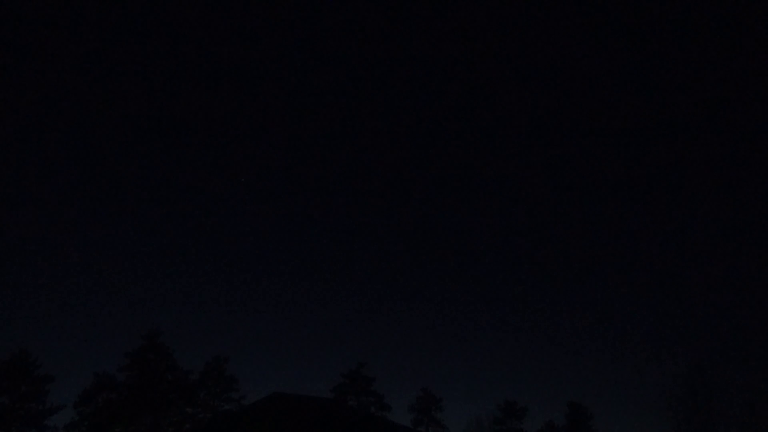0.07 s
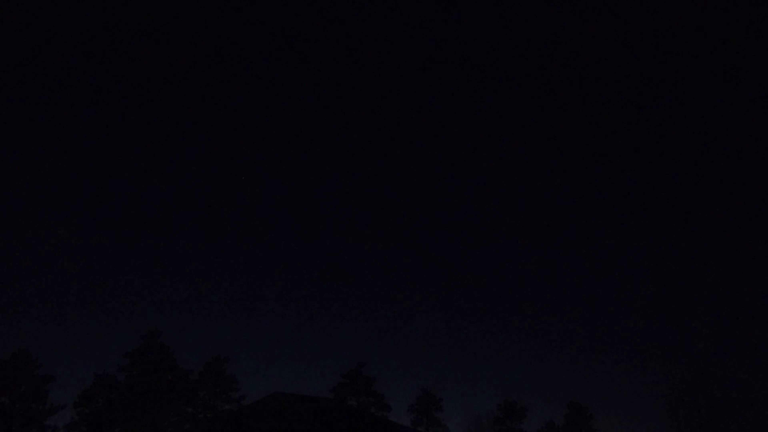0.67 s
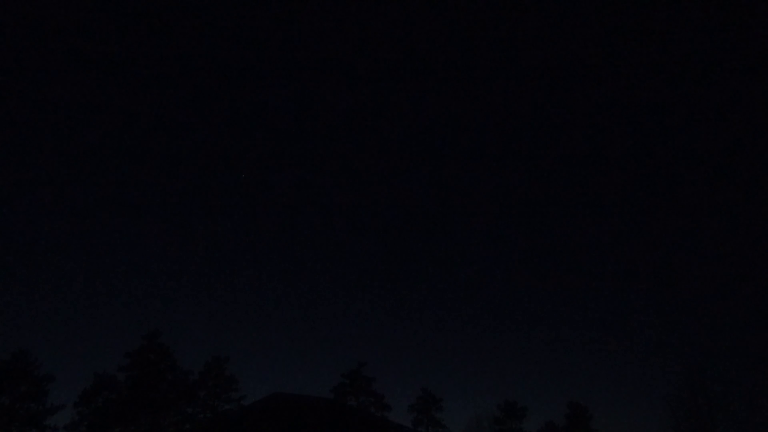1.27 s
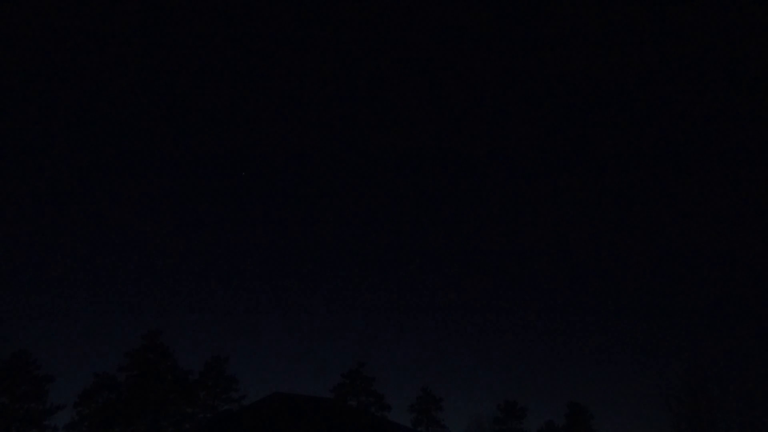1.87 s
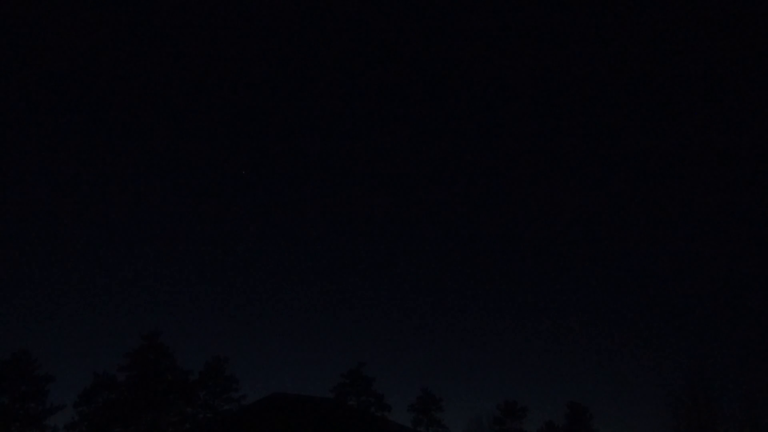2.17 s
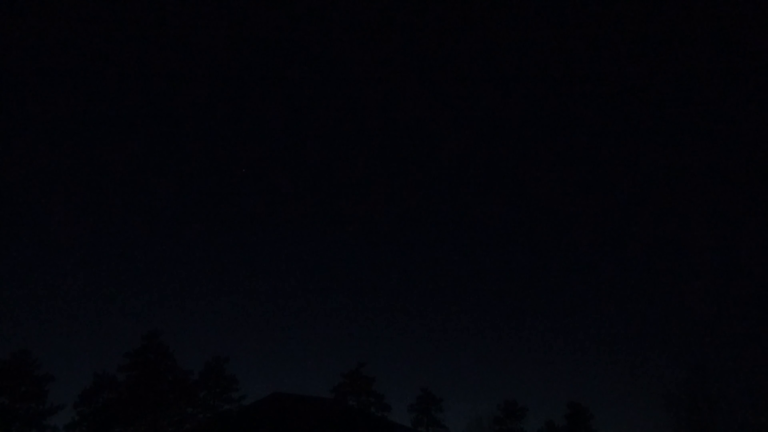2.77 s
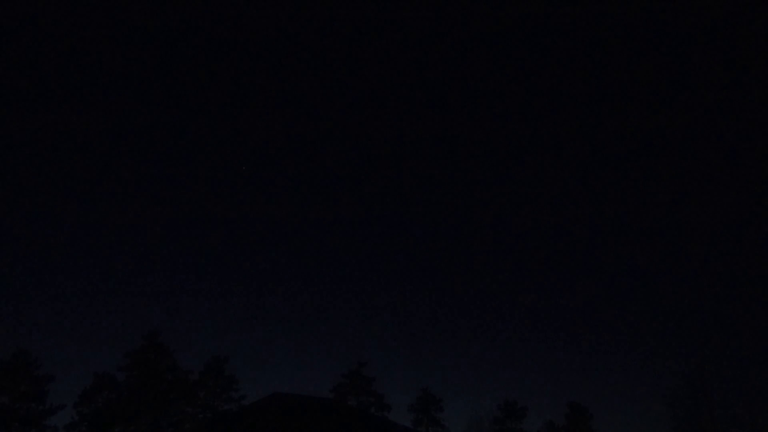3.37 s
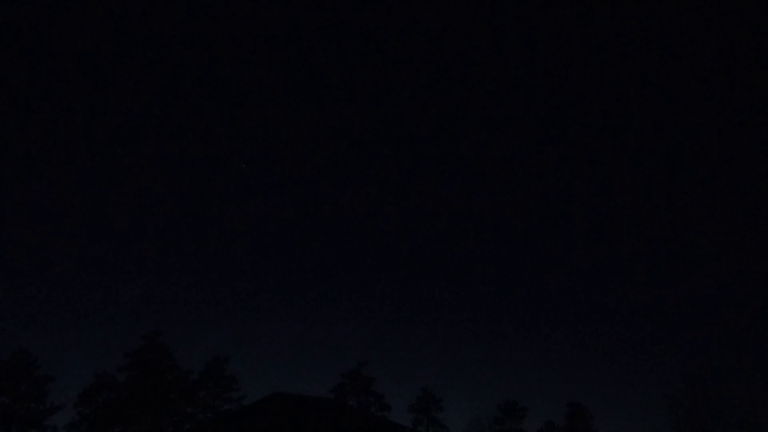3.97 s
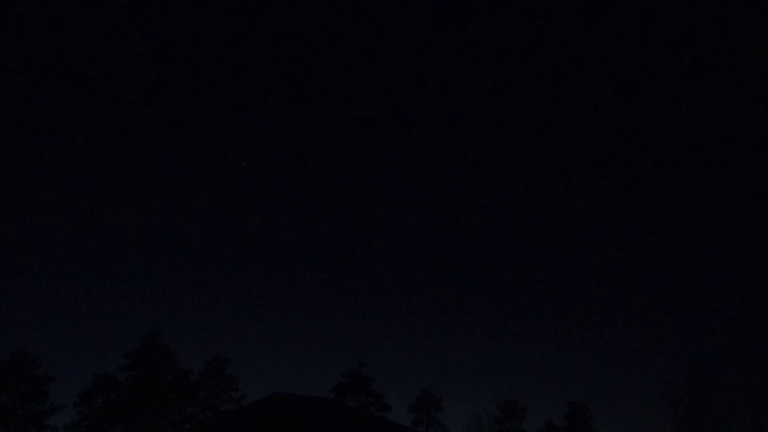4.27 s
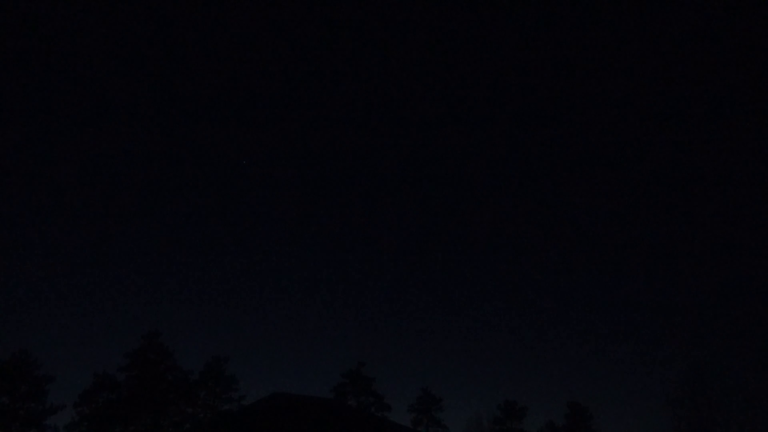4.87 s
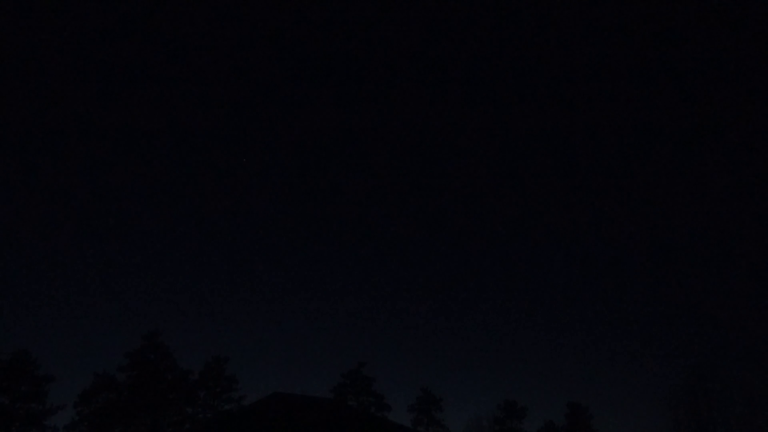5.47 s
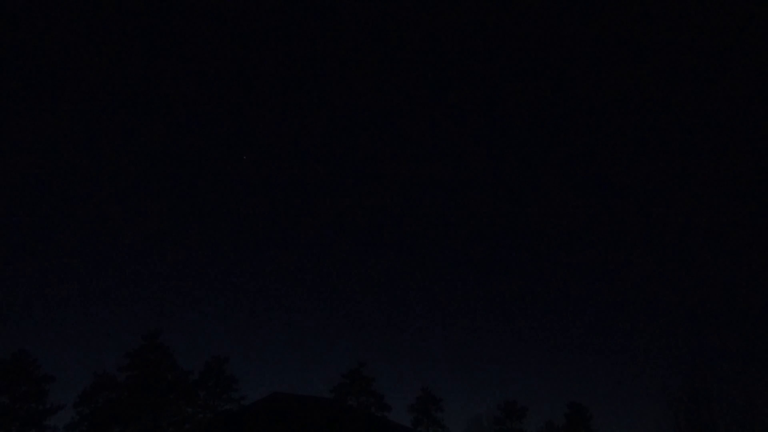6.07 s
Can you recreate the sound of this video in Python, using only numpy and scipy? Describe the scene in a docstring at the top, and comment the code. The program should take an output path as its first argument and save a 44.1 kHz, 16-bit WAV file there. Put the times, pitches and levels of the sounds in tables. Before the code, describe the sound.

A steady night chorus of frogs whistles, ticks and chuckles, with a few short croaks and light hiss underneath.

```python
"""A pond at night, a little to the right, over a low rumble, a far chorus and a camera's hum and hiss.
From the start three kinds of frogs call at once: peepers whistle short rising notes, small frogs tick
like pebbles as the larynx rings the vocal sac, larger ones chuckle in pulses through throat and chest.
Three croaks come in the first two seconds, a faint dry snap stands out at 4.6 s, and two more croaks
follow. The calling runs on to the end, with the trees giving peeps and ticks a thin tail."""
import sys
import numpy as np
from scipy import signal
from scipy.fft import rfft, irfft, next_fast_len
from scipy.io import wavfile
from scipy.ndimage import map_coordinates

SR = 44100
rng = np.random.default_rng(int(sys.argv[2]) if len(sys.argv) > 2 else 0)


def output_pcm(signal):
    """Save a mono or channel-first signal as 16-bit PCM at the path in sys.argv[1].

    Samples are clipped to [-1, 1] before scaling.
    """
    pcm = np.clip(np.atleast_2d(signal).T, -1, 1) * 32767
    wavfile.write(sys.argv[1], SR, np.round(pcm).astype(np.int16))


N = 273861

# Tone curves of the noise beds; SIDE is what differs between the ears: (frequency [Hz], relative level [dB])
RUMBLE_EQ = [(20, -17), (75, 2), (140, -4.5), (210, -10), (400, -20.5), (900, -56)]
RUMBLE_SIDE_EQ = [(20, -24), (75, -3), (140, -2), (210, -3), (400, -13), (900, -62)]
HISS_EQ = [(100, 5), (2500, 13), (7000, 3), (15500, -3)]
HISS_SIDE_EQ = [(100, 3), (2500, 11), (7000, 6.5), (10000, 4), (15500, -20)]
FAR_CHUCKLE_EQ = [(380, -16), (520, -6), (850, -6), (1250, -9), (1900, -3), (2500, -19.5), (3200, -32)]
# Dry snaps close by: (time [s], level before filtering [dB])
DRY_SNAPS = [(.31, -38), (2.773, -41), (4.631, -31)]
# The larger frogs: (throat resonance [Hz], rms level [dB], cluck times [s])
CLUCKING_FROGS = [(1660, -48.5, [1.026, 1.21, 1.275, 1.565, 1.759, 4.415, 4.9, 5.733, 5.796]),
                  (1830, -48.5, [.423, .742, .803, 2.157, 3.225, 3.4, 3.743, 4.118, 4.555]),
                  (2130, -48, [.111, .355, 1.823, 2.893, 3.505, 4.187, 6.089])]
# Their drawn-out croaks: (time [s], length [s], rms level [dB])
LONG_CROAKS = [(0.546, 0.13, -48.5), (1.098, 0.16, -50), (1.695, 0.11, -51), (4.998, 0.14, -50),
               (5.861, 0.042, -48.5)]
# Near ticking frogs: (sac pitch [Hz], bouts), each bout (start [s], end [s], ticks [count], level [dB])
TICKING_FROGS = [(3590, [(.14, .49, 5, -31), (.705, 1.085, 5, -27.5), (1.207, 1.458, 3, -28.5),
                 (1.498, 1.78, 4, -31.5), (2.075, 2.356, 4, -30.3), (2.466, 2.659, 3, -28),
                 (2.796, 2.897, 2, -32), (3.449, 3.535, 2, -35), (3.744, 3.906, 3, -29.5),
                 (4.13, 4.393, 4, -30.5), (4.262, 4.34, 2, -29), (4.491, 4.735, 3, -29),
                 (4.843, 5.3, 6, -30), (5.163, 5.478, 4, -29.5), (5.58, 5.67, 2, -30.5),
                 (5.997, 6.17, 3, -29)]), (3860, [(.031, .312, 4, -36), (.917, 1.094, 3, -34),
                 (1.458, 1.546, 2, -34), (3.808, 4.102, 4, -33), (5.086, 5.285, 3, -41)]),
                 (4020, [(.433, .865, 6, -34.5), (1.905, 2.375, 6, -34.5), (2.965, 3.039, 2, -34),
                 (3.114, 3.469, 5, -33), (5.67, 6.099, 6, -32.5)])]
# Near peepers, each repeating its own note: (start pitch [Hz], end pitch [Hz], length [s],
# rms level [dB], crest [share of the note], left minus right [dB], call times [s])
PEEPING_FROGS = [(2883, 3226, .13, -37.5, 0.54, -5, [.008, 1.204, 1.528, 2.54, 2.738, 4.027, 4.411, 5.407]),
                 (2667, 2882, .112, -40.5, 0.11, -5, [.047, 1.153, 2.725, 4.383, 5.674]),
                 (2722, 3014, .118, -40.5, 0.2, -6.3, [.67, .888, 2.286, 2.519, 4.301, 5.175, 5.378]),
                 (2693, 3080, .195, -43.5, .55, -4.6, [.938, 1.63, 3.01, 3.205, 4.786]),
                 (2850, 3200, .132, -42.9, 0.38, -4.5, [.376, 1.623, 2.98, 4.219, 4.613, 4.968, 5.609]),
                 (2945, 3270, .135, -46.5, 0.34, -5, [.155, 0.451, .87, 1.35, 1.92, 2.235, 2.49, 2.835, 2.92, 3.245, 4.18, 4.5, 5.035]),
                 (2744, 3060, .15, -48.5, 0.48, -3, [.24, 0.551, 1.871, 2.455])]

TICK_RISE_S = .002  # time for the vocal sac to ring up


def amp(db):
    return 10 ** (np.asarray(db) / 20)


def unit_rms(x):
    return x / np.sqrt(np.mean(x ** 2) + 1e-20)


def filtered(x, response):
    """Shape x with a gain given as a function of frequency."""
    size = next_fast_len(x.shape[-1] + SR // 10)
    return irfft(rfft(x, size) * response(np.fft.rfftfreq(size, 1 / SR)), size)[..., :x.shape[-1]]


def noise(eq):
    """A noise bed of rms 1, coloured by a tone curve."""
    hz, db = np.transpose(eq)
    response = lambda f: amp(np.interp(np.log(f + 1), np.log(hz), db))
    return unit_rms(filtered(rng.standard_normal(N), response))


def resonance(f, hz, width_hz):
    return 1j * f * width_hz / (hz * hz - f * f + 1j * f * width_hz)


def wobble(n, rate_hz):
    """A smooth random modulator, n samples long."""
    knots = rng.standard_normal(int(n * rate_hz / SR) + 4)
    return map_coordinates(knots, [np.arange(n) * rate_hz / SR])


def panned(x, left_db):
    """Pan x so that left minus right is left_db; the two average to x."""
    gains = amp([[left_db / 2], [-left_db / 2]])
    return x * gains / gains.mean()


def add(track, time, x):
    """Mix x into the track at a time in seconds."""
    start = int(time * SR)
    lo, hi = max(start, 0), min(start + x.shape[-1], N)
    if hi > lo:
        track[..., lo:hi] += x[..., lo - start:hi - start]


def background(rumble_db=-56, hum_hz=173.2, hum_db=-65, hiss_db=-62, chuckle_db=-67):
    """Distant rumble, hum and microphone hiss near the centre; the farthest chuckling spreads wide."""
    side = np.array([[1], [-1]])
    rumble = amp(rumble_db) * (noise(RUMBLE_EQ) + amp(-18.5) * side * noise(RUMBLE_SIDE_EQ))
    hum_gain = amp(hum_db + wobble(N, 1.86))
    hum_phase = 2 * np.pi * np.cumsum(hum_hz + wobble(N, 1.996)) / SR
    hum = hum_gain * unit_rms(np.sin(hum_phase))
    hiss = amp(hiss_db) * (noise(HISS_EQ) + amp(-8) * side * noise(HISS_SIDE_EQ))
    return rumble + hum + hiss + amp(chuckle_db) * side * noise(FAR_CHUCKLE_EQ)


def tree_echoes(x, wet_db=-15, rt60_s=.55):
    """The trees round the pond scatter a thin tail back."""
    t = np.arange(SR // 2) / SR
    tail = rng.standard_normal(len(t)) * amp(-60 * t / rt60_s)
    return amp(wet_db) * signal.fftconvolve(x, tail[None] / np.linalg.norm(tail), axes=1)[:, :N]


def snaps(fade_s=.022):
    """Short bright cracks with the top end softened."""
    out = np.zeros(N)
    t = np.arange(SR // 20) / SR
    for time, db in DRY_SNAPS:
        add(out, time, amp(db - 60 * t / fade_s) * rng.standard_normal(len(t)))
    return filtered(out, lambda f: resonance(f, hz=5500, width_hz=1400) / np.hypot(1, f / 12000))


def cluck(length, throat_hz, pulse_hz=400, chest_hz=820, chest_db=-6.5, rasp=.094):
    """A rough burst of pulses with a fast attack, through the throat and chest resonances."""
    n = int((length + .011) * SR)
    cycles = np.cumsum(pulse_hz * np.exp(.13 * wobble(n, 300))) / SR
    pulses = np.diff(np.floor(cycles), prepend=0) + rasp * rng.standard_normal(n)
    envelope = np.sin(np.pi * (np.arange(n) / n) ** .46)
    body = lambda f: resonance(f, throat_hz, 300) - amp(chest_db) * resonance(f, chest_hz, 320)
    band = lambda f: 1 / np.hypot(1, (f / 2400) ** 10) / np.hypot(1, (660 / (f + 1)) ** 10)
    return unit_rms(filtered(pulses * envelope, lambda f: body(f) * band(f)))


def chucklers(far_db=-56, bed_db=-54.5, left_db=-3, cluck_s=.022, vary_hz=50, far_count=40):
    """The larger frogs: near clucks and croaks, scattered farther ones, and a wash of the farthest."""
    out = amp(bed_db + wobble(N, 18)) * noise(FAR_CHUCKLE_EQ)
    for throat_hz, db, times in CLUCKING_FROGS:
        for time in times:
            add(out, time - .002, amp(db) * cluck(cluck_s, throat_hz + vary_hz * rng.normal()))
    for time, length, db in LONG_CROAKS:
        add(out, time, amp(db) * cluck(length, throat_hz=1875))
    for when, pitch in rng.random((far_count, 2)):
        add(out, when * N / SR, amp(far_db) * cluck(cluck_s, throat_hz=1700 + 300 * pitch))
    return panned(out, left_db)


def tick(sac_hz, sag_hz=50, snap_db=-24, snap_decay_s=.004, snap_band_hz=(4700, 5850)):
    """A snap of the larynx rings the vocal sac for a few milliseconds while its pitch sags."""
    t = np.arange(SR // 70) / SR
    age = t / TICK_RISE_S  # the ring peaks at age 1
    hz = sac_hz + sag_hz * (np.exp(1 - age) - 1)
    phase = 2 * np.pi * (np.cumsum(hz) / SR + rng.random())
    ring = (age * np.exp(1 - age)) ** 2 * np.sin(phase)
    burst = rng.standard_normal(len(t)) * np.exp(-t / snap_decay_s)
    snap = signal.lfilter(*signal.butter(3, snap_band_hz, "band", fs=SR), burst)
    return ring + amp(snap_db) * snap / np.abs(snap).max()


def tick_chorus(nearest_db=-33, depth_db=16, centre_hz=3585, spread_hz=450, left_db=-4.5, count=20):
    """Many small frogs, ever farther away, each ticking at its own nearly even pace."""
    out = np.zeros((2, N))
    for frog in range(count):
        ticks_per_s = 11.2 * np.exp(rng.normal() / 10)
        beats = np.cumsum(1 + rng.standard_normal(160) / 20)
        times = beats / ticks_per_s - 1 - rng.random()  # already under way at the start
        db = nearest_db - depth_db * np.sqrt(frog / count)
        for time, (accent, pitch, pan) in zip(times, rng.standard_normal((len(times), 3))):
            if 0 < time < N / SR:
                hz = centre_hz + spread_hz * np.tanh(pitch / 2)
                add(out, time, panned(amp(db + 2 * np.tanh(accent)) * tick(hz), left_db + pan))
    return out


def tickers(left_db=-5, vary_hz=50, slowing=.06, swell_db=1.5, trail_db=-10, trail_s=.0063, drop_hz=100):
    """Near frogs tick in bouts that slow and swell; a weaker, lower pulse trails each tick."""
    out = np.zeros((2, N))
    for sac_hz, bouts in TICKING_FROGS:
        for start, end, ticks, bout_db in bouts:
            for progress in np.linspace(0, 1, round(ticks)):
                pitch, gap, accent, pan = rng.standard_normal(4)
                time = start + (end - start) * (progress - slowing * progress * (1 - progress))
                db = bout_db + swell_db * (progress - .5)
                hz = sac_hz + vary_hz * pitch
                add(out, time - TICK_RISE_S, panned(amp(db) * tick(hz), left_db + pan))
                trail = amp(db + trail_db + accent) * tick(hz - drop_hz)
                add(out, time + trail_s * np.exp(gap / 2), panned(trail, left_db + pan))
    return out


def peep(length, start_hz, end_hz, crest=.23, bend=.363, flutter_db=.53, overtone_db=-34):
    """A nearly pure whistle whose rise flattens out; the vocal sac leaks a faint overtone a fifth up."""
    t = np.arange(int(length * SR)) / SR
    progress = t / length
    glide = progress + bend * progress * (1 - progress)
    hz = start_hz + (end_hz - start_hz) * glide + 8 * wobble(len(t), 138)
    phase = 2 * np.pi * (np.cumsum(hz) / SR + rng.random())
    tone = np.sin(phase) + amp(overtone_db) * np.sin(1.5 * phase)
    swell = np.exp(-1.35 * (progress - crest) ** 2)
    attack = 1 - np.exp(-t / .007)
    release = np.clip((length - t) / .01, 0, 1)
    flutter = amp(flutter_db * wobble(len(t), 89))
    return unit_rms(swell * attack * release * flutter * tone)


def peepers(left_db=-5, answer_db=-52, answer_within_s=.13, far_db=-63, vary_hz=7, far_count=360):
    """Near callers, each answered by a farther neighbour, over a blur of faint distant peeps."""
    out = np.zeros((2, N))
    far_peep = lambda hz: peep(.14, hz, hz + 280)
    for start_hz, end_hz, length, db, crest, place_db, times in PEEPING_FROGS:
        for time, (pitch, pan) in zip(times, rng.standard_normal((len(times), 2))):
            note = amp(db) * peep(length, start_hz + vary_hz * pitch, end_hz + vary_hz * pitch, crest)
            add(out, time - .004, panned(note, place_db + pan / 2))
            answer = amp(answer_db) * far_peep(rng.uniform(2820, 3050))
            add(out, time + answer_within_s * rng.random(), panned(answer, left_db))
    for slot, jitter in enumerate(rng.random(far_count)):
        time = (slot + 2 * jitter - 2) / far_count * N / SR
        add(out, time, panned(amp(far_db) * far_peep(rng.uniform(2700, 3100)), left_db))
    return out


def scene():
    """Three kinds of frogs over the night bed; only peeps and ticks feed the echoes."""
    high_voices = peepers() + tickers() + tick_chorus()
    return high_voices + tree_echoes(high_voices) + chucklers() + snaps() + background()


def record(dry):
    """The camera's band limit: a hard high cut."""
    return filtered(dry, lambda hz: hz < 15770)


dry = scene()
out = record(dry)
output_pcm(out)
```